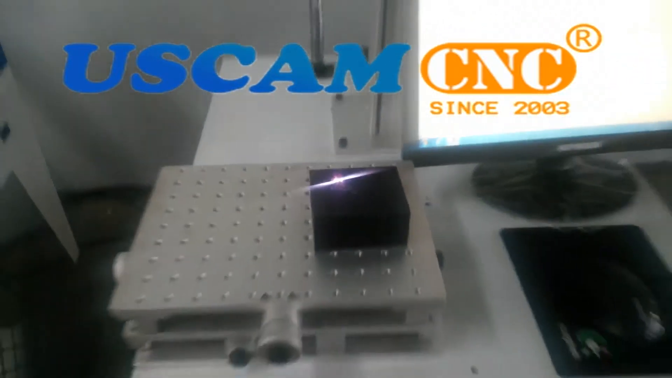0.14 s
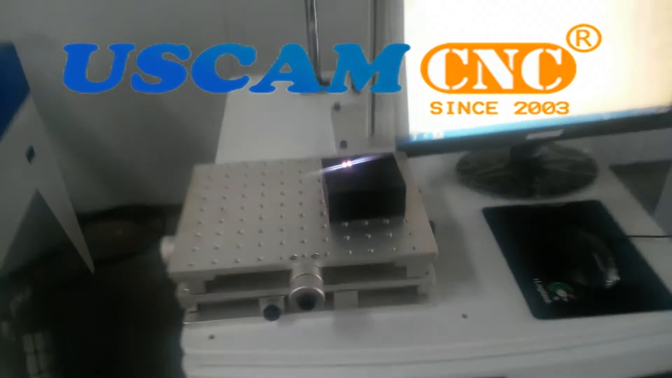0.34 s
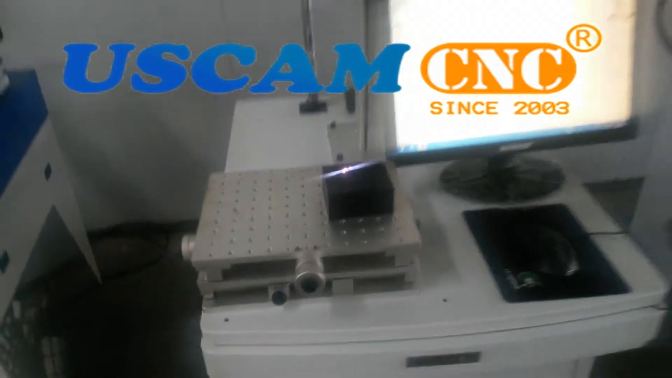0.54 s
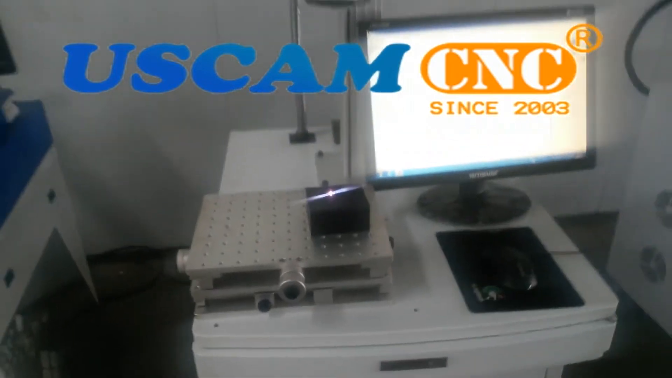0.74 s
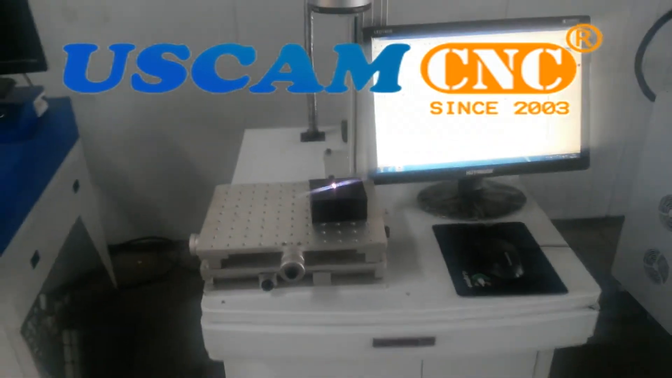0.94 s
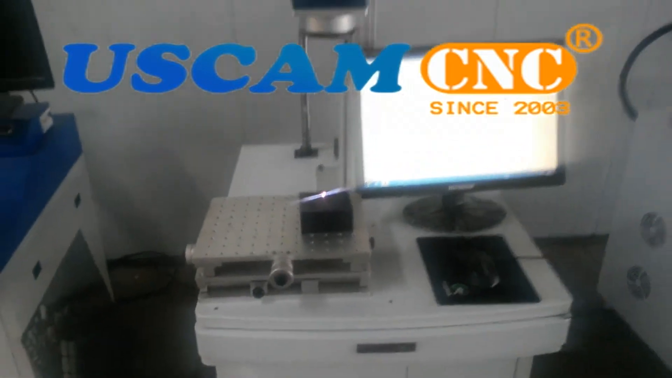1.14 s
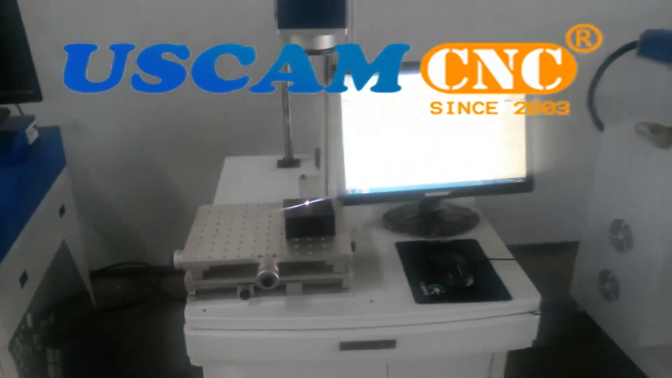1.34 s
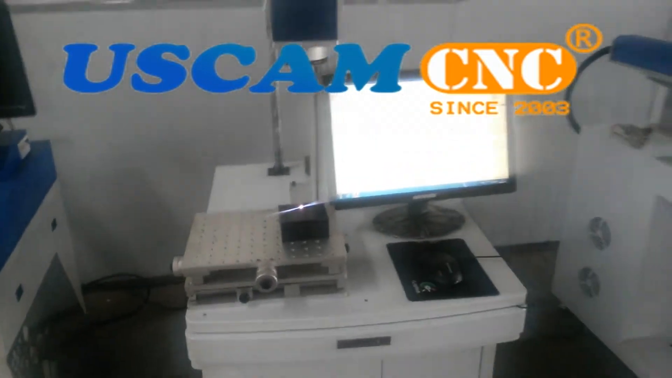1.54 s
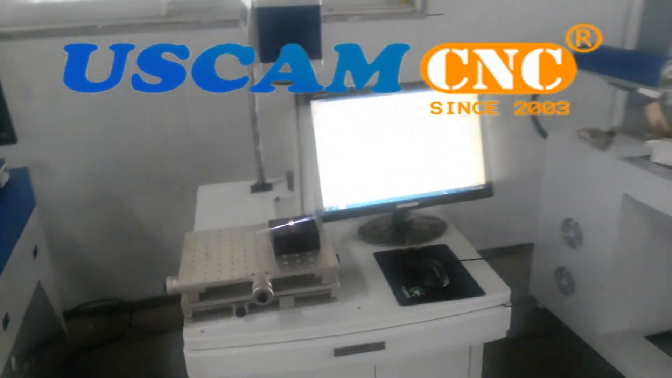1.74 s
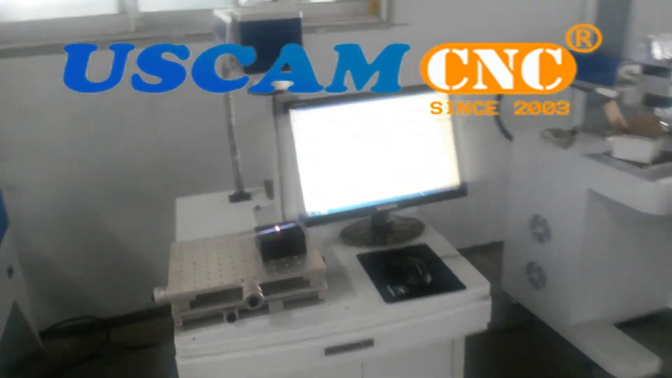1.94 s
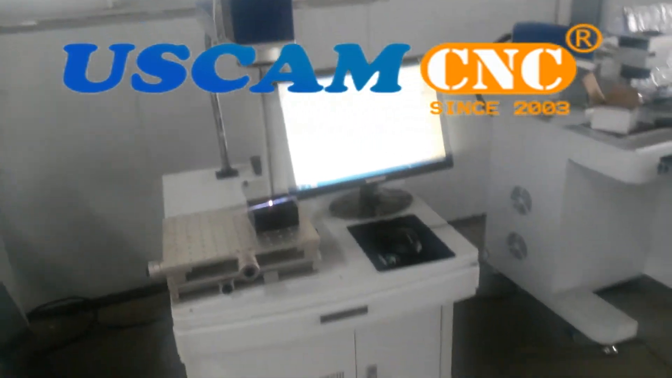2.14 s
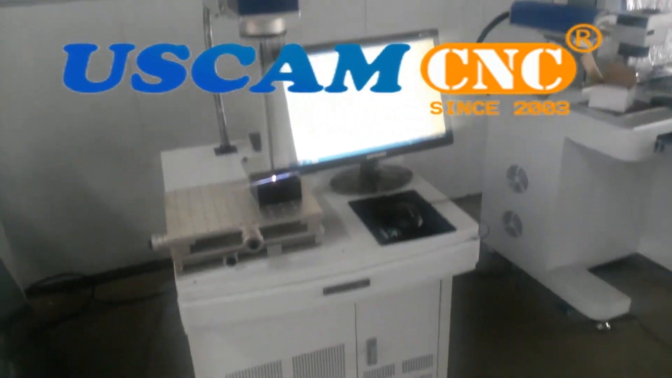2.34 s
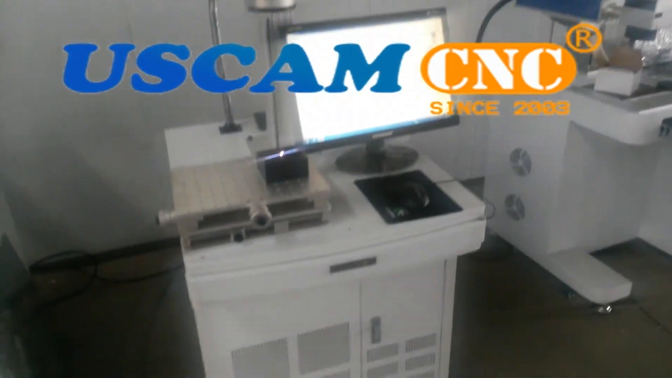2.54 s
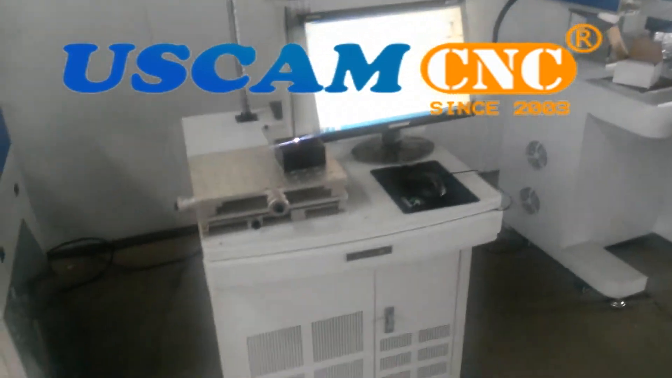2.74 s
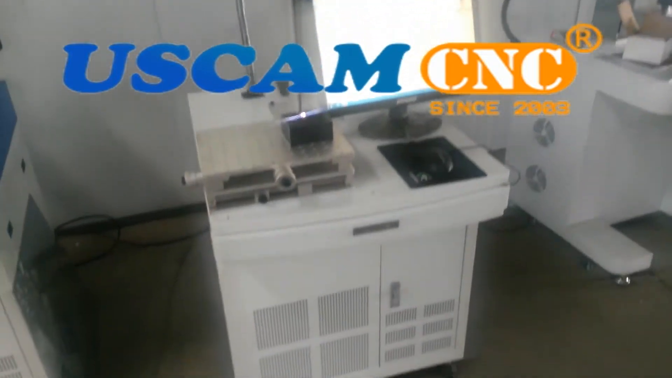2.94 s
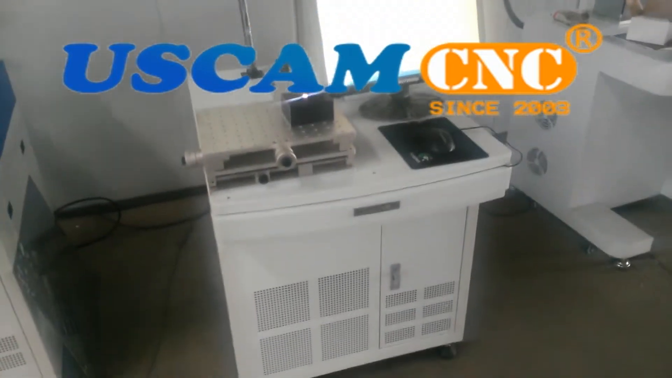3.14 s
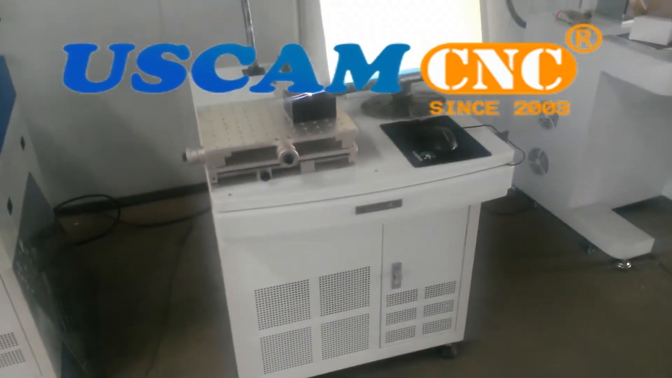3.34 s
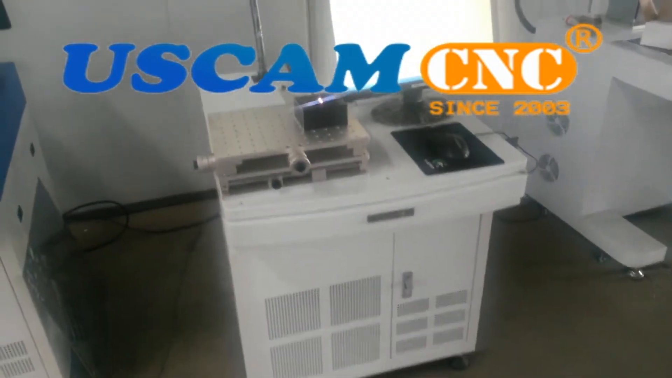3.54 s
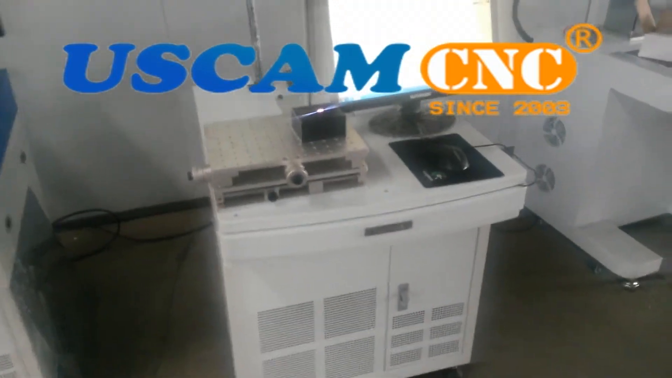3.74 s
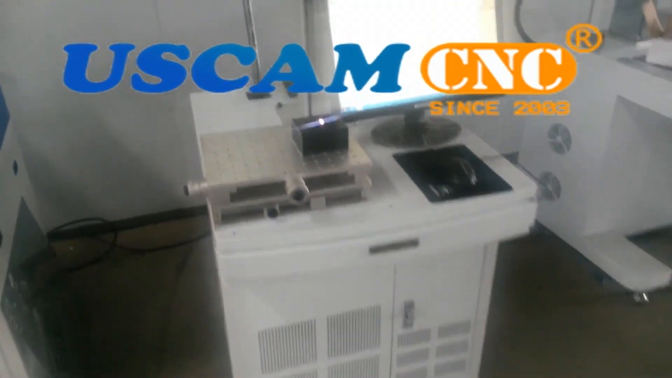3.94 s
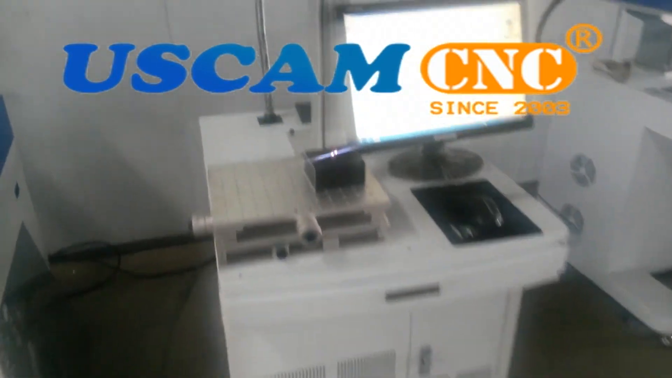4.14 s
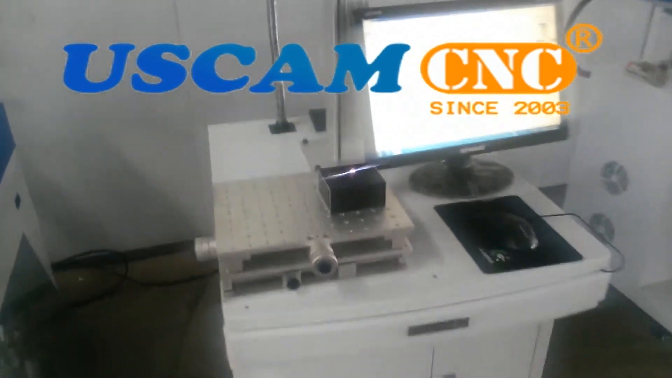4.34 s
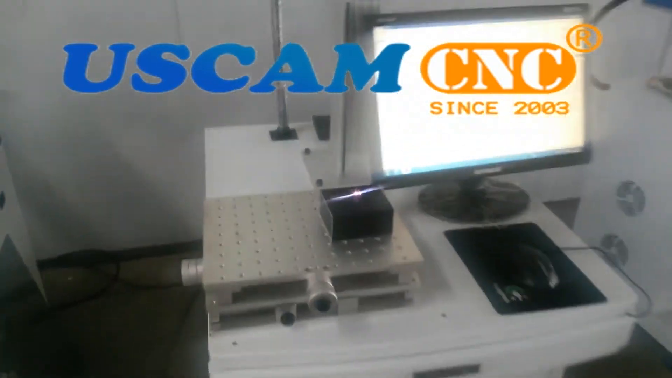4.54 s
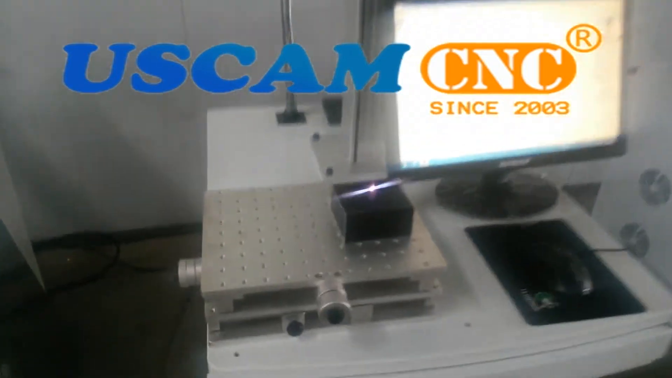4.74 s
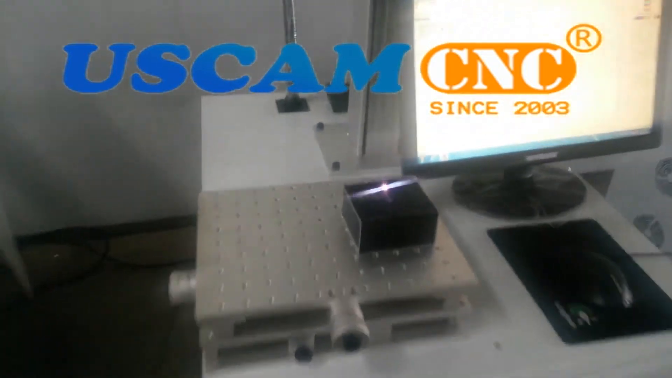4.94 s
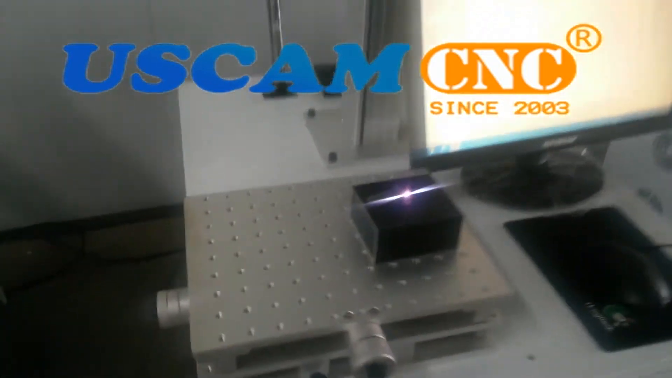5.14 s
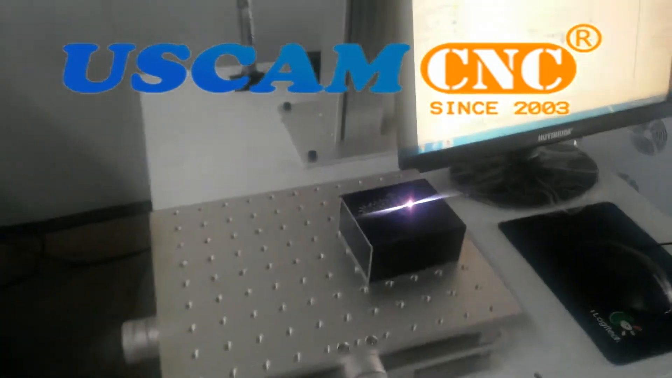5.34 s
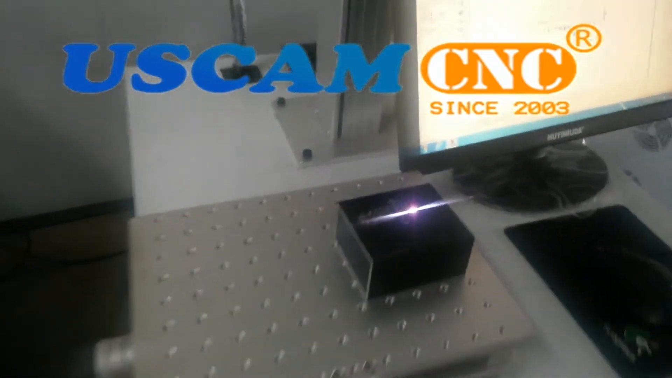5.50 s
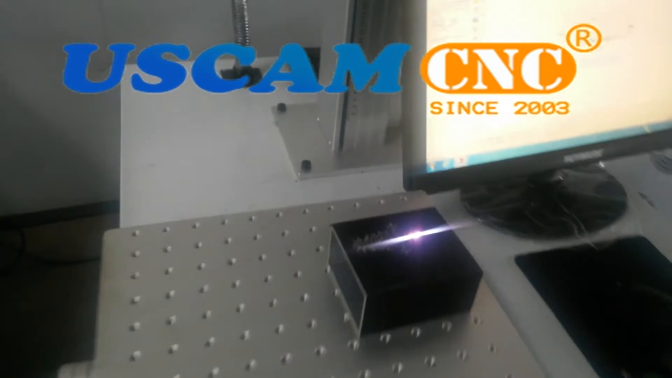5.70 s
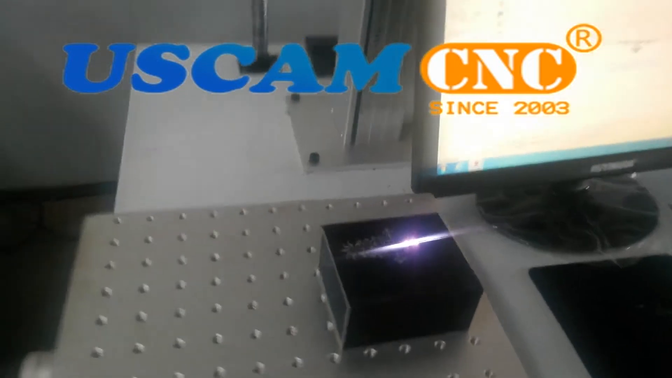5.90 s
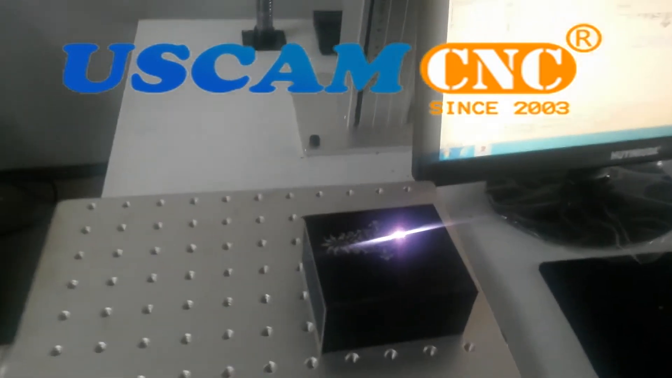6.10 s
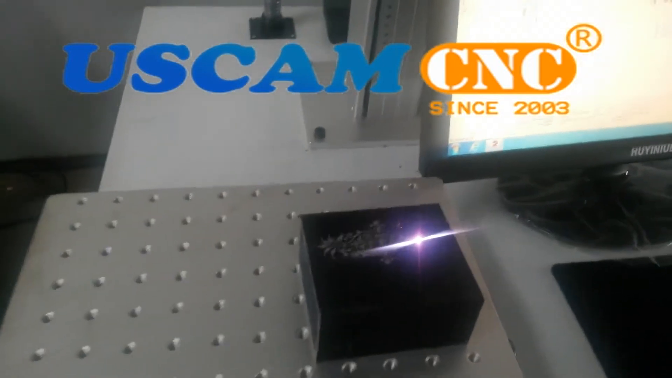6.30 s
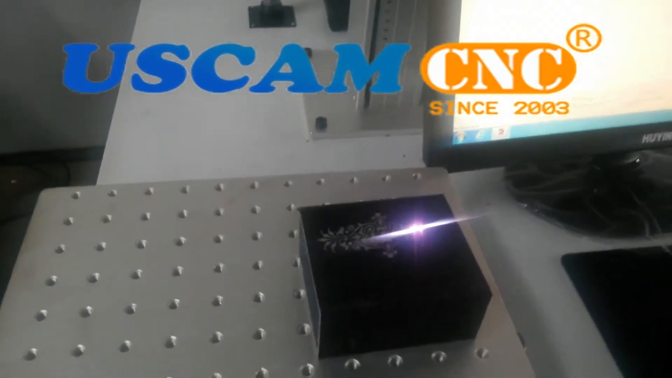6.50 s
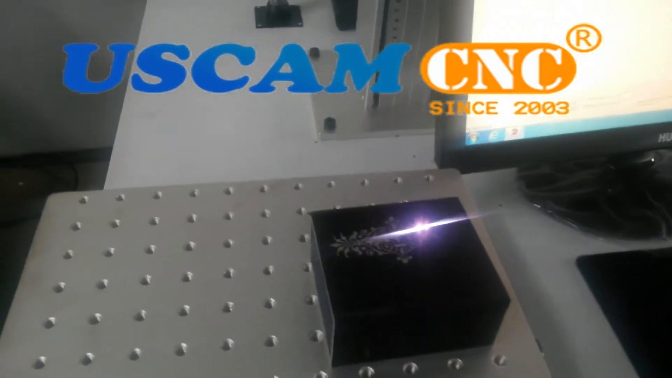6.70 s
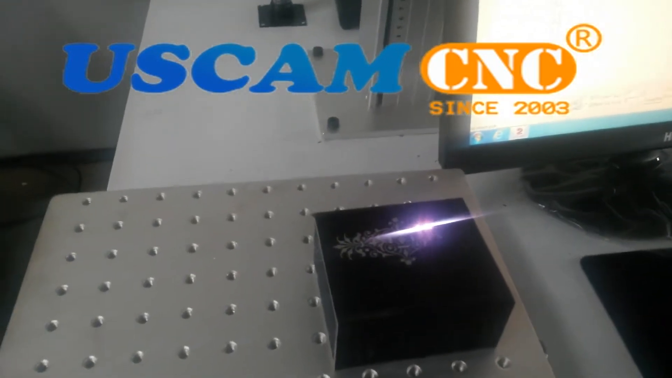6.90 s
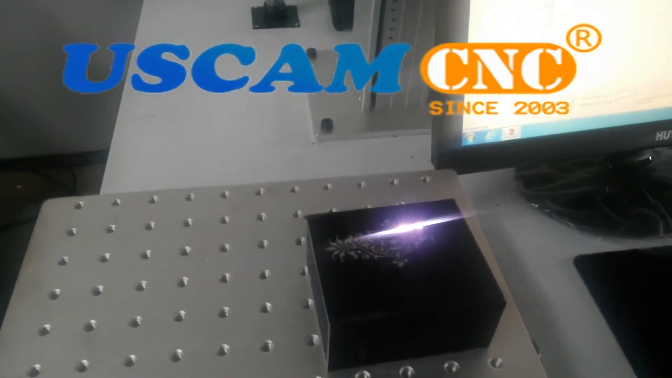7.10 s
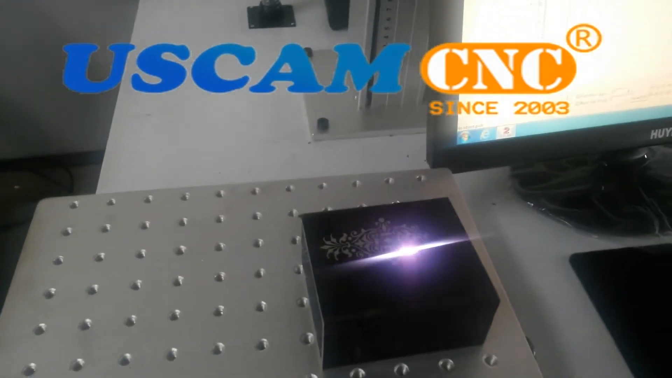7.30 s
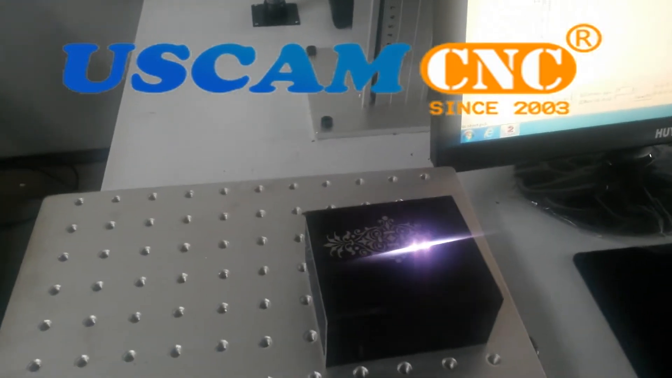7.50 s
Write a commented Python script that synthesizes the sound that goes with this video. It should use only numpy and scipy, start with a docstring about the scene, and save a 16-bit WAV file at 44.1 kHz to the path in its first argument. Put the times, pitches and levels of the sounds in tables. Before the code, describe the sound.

A laser marking machine engraves a steel block in a hard-walled workshop. Tiny rapid pops merge into a crackling buzz that keeps jumping in pitch, with a high hiss and thin whine, over steady cooling fans. At first it sounds distant and roomy. Just past halfway, the handheld microphone takes a short rumble and a clicking knock, then moves close, and the crackle turns louder and drier, with a few sharp snaps.

```python
"""Laser marking a steel block

Each scan line fires a row of tiny plasma pops, so the crackle buzzes at the gliding line rate.
Vapour hisses and the scan mirror whines. Cooling fans run in the hard-walled workshop.
A hand-held camera stands back, then comes close; a finger knocks it a few times."""
import sys
import numpy as np
from scipy import signal
from scipy.fft import rfft, irfft, next_fast_len
from scipy.io import wavfile
from scipy.ndimage import uniform_filter1d, map_coordinates

SR = 44100
rng = np.random.default_rng(int(sys.argv[2]) if len(sys.argv) > 2 else 0)


def digitize_waveform(pressure):
    """Quantize a signal to 16-bit integers and store it at the path in sys.argv[1].

    Rows of a 2-D input are taken as channels; values are limited to [-1, 1].
    """
    field = np.atleast_2d(pressure).T
    bounded = np.clip(field, -1, 1)
    quanta = np.round(bounded * 32767).astype(np.int16)
    wavfile.write(sys.argv[1], SR, quanta)


N = 333396

# Camera path. Each row: time in seconds, place (0 back in the room, 1 table edge, 2 over the block),
# relative crackle level in dB, left minus right in dB.
CAMERA_PATH = [(0, 0.42, -39, -2), (.8, 0.037, -41, 0.6), (2.9, .007, -41, 1.2), (3.7, 0.46, -36.5, -1),
               (4.15, 1.03, -35.5, 1.1), (4.8, 1.046, -34.5, 2.5), (5.15, 2.016, -31, 1.1),
               (5.7, 1.92, -30, 0), (6.5, 1.95, -30.5, 1.2), (7.56, 2.03, -30, 1.2)]
# Broad hatching. Each row: time in seconds, line rate in Hz, evenness (0 ragged, 1 even).
BROAD_SCAN = [(0, 164, 0.59), (.22, 135, 0.68), (.8, 92.5, 0.49), (1.3, 134, 0.62), (1.42, 126.5, 0.7),
              (2.4, 136, 0.67), (2.7, 140, 0.72), (2.78, 132, 0.76), (2.82, 93, .7), (3.36, 92, 0.71),
              (3.42, 87, 0.81), (3.48, 85, .85), (3.54, 87, .8), (4.47, 105, 0.72), (4.66, 94, 0.85),
              (4.7, 104, 0.54), (4.77, 46, .2), (4.88, 53.5, .2), (4.93, 94, 0.81), (5.04, 95.6, 0.87),
              (5.13, 102.4, 0.69), (5.65, 102, 0.84), (5.73, 93, .85), (5.77, 77, 0.8), (5.87, 68, .8),
              (5.96, 76.6, .7), (6.05, 60, 0.4), (6.33, 48.8, .2), (6.5, 70, 0.8), (6.58, 70, 0.84),
              (6.66, 72.6, 0.82), (6.76, 91.5, 0.91), (6.82, 103, 0.86)]
# Narrow shapes. Each row: start and length in seconds, line rate in Hz at start, middle and end,
# evenness, relative level in dB, return stroke's delay as a share of a line.
NARROW_SHAPES = [(0.362, 0.18, 223, 186, 190, 0.59, 0.5, 0.48),
                 (0.568, 0.076, 346, 320, 226, 0.47, 2, 0.48), (0.939, .11, 250, 310, 254, 0.68, 2.5, .5),
                 (1.07, .2, 198, 180, 143, 0.5, 1.5, 0.44), (1.52, 0.067, 370, 386, 377, 0.65, 1, 0.49),
                 (1.6, 0.082, 345, 316, 347, 0.58, 2.5, .5), (1.701, 0.057, 340, 384, 390, 0.59, 1.5, 0.53),
                 (1.79, .19, 286, 334, 317, 0.31, 0, 0.46), (2.0, 0.073, 334, 332, 344, 0.72, .7, 0.48),
                 (2.11, .21, 336, 283, 310, 0.47, 0.5, 0.48), (2.485, 0.074, 238, 236, 217, 0.87, 2.5, .5),
                 (2.97, .09, 111, 103, 107, 0.84, 1, 0.47), (3.07, 0.074, 370, 346, 340, 0.7, 1, .5),
                 (3.159, .13, 194, 183, 190, 0.62, 1, .5), (3.545, 0.17, 119, 126, 137, 0.88, -1, 0.49),
                 (3.72, 0.068, 135, 128, 144, 0.72, .5, 0.46), (3.801, 0.082, 205, 177, 186, 0.79, 1, .5),
                 (3.9, .13, 131, 137, 158, 0.79, 0.5, .47), (4.045, 0.071, 300, 262, 230, .85, 1.5, .56),
                 (4.115, 0.125, 226, 223, 225, .95, 0.5, .622), (4.24, .06, 225, 233, 255, .9, .5, .622),
                 (4.305, .1, 315, 277, 253, 0.92, 0, .56), (5.175, 0.059, 264, 261, 265, .9, 0.6, .44),
                 (5.235, .065, 262, 288, 337, 0.78, 1.5, 0.45), (5.31, .03, 208, 195, 226, .5, 1, 0.46),
                 (5.35, 0.16, 360, 270, 205, .68, 0, 0.46), (5.521, .055, 310, 355, 392, 0.83, 0.5, 0.34),
                 (5.576, 0.055, 370, 422, 428, 0.91, 1, 0.41), (6.2, .065, 258, 317, 267, 0.31, 1.5, 0.49),
                 (6.845, .1, 387, 390, 368, .998, 1.5, .488), (6.95, 0.049, 367, 325, 233, .68, -0.3, .47),
                 (7.005, 0.039, 202, 197, 208, .85, -1.5, 0.47),
                 (7.05, .035, 280, 325, 260, 0.51, -1.5, 0.46),
                 (7.09, 0.058, 208, 189, 243, 0.82, -2, 0.47), (7.16, .11, 216, 213, 188, .76, -1.1, .46),
                 (7.275, 0.086, 176, 159, 166, 0.82, -2, 0.44), (7.37, .11, 142, 126, 121, 0.82, -3, .47),
                 (7.49, 0.071, 210, 257, 326, 0.68, -1.5, 0.43)]
# Beam off between shapes. Each row: start and length in seconds.
BEAM_JUMPS = [(4.764, 0.0068), (5.305, .006), (6.024, .004), (6.106, .004), (6.115, .007), (6.131, .005),
              (6.151, .005), (6.23, .008), (6.303, .005), (6.314, .005)]
# Scan mirror modes, close up and from the room. Each row: centre and width in Hz, relative level in dB.
MIRROR_NEAR = [(1110, 160, -9), (1790, 280, -7), (2217, 240, -0.5), (3546, 120, -2)]
MIRROR_FAR = [(2212, 270, 0)]
# Single hard pops. Each row: time in seconds, relative level in dB.
HARD_POPS = [(4.7217, -31), (4.8495, -25), (4.866, -25), (4.976, -20), (6.037, -23), (6.125, -18),
             (6.143, -23), (6.3128, -25), (7.0976, -12), (7.2085, -20)]
# Left microphone port's lag. Each row: frequency in Hz, lag in radians from the room and close up.
PORT_LAG = [(200, .05, .05), (1550, 0.31, .35), (2400, 2.9, 1.8), (3450, 3.5, 2.85), (4400, 4.8, 3.6),
            (5500, 6, 3.88), (6530, 6, 3.3), (7200, 6.4, 5.56), (10000, 9.8, 7)]
# Pop colour from each place. Each row: frequency in Hz, left and right gain in dB.
COLOUR_ROOM = [(150, -22, -23), (468, -10.5, -8.5), (705, -12.5, -14), (930, -10.5, -9),
               (1270, -5.5, -22.5), (1710, 5.5, -3.5), (2216, 8, -8), (2770, -1.5, -7), (3490, 6.5, 0.5),
               (3920, 2, -2), (4300, -1, 1.5), (5450, -3, 6.5), (5940, -16, 3.5), (6680, -2, 1.5),
               (7960, -9.5, -5), (10500, -19, -11)]
COLOUR_EDGE = [(150, -14, -10.5), (466, -15, -16), (717, -4, -7.5), (920, -6, -15.5), (1320, -14, -30),
               (1730, 2.5, -12.5), (2310, 5.5, -2), (2830, 2, -3.5), (3400, 6, -3.5), (3600, 12, 6),
               (4240, -2.5, -2), (5000, -0.5, 2), (5550, -2, 6), (6170, -13, 0.5), (6750, -2, -3.5),
               (7900, -12, -2.5), (9900, -7.5, -6)]
COLOUR_ABOVE = [(150, -17, -17.5), (475, -17, -19.5), (590, -12, -11.5), (793, -7.5, -9), (900, -25, -23),
                (1020, -6, -9), (1170, -6, -8.5), (1275, -16, -23.5), (1505.8, 0, -8.5), (1685, 1.5, -9.5),
                (1940, 6.5, -4), (2439.4, 5, -2.5), (2900, 1, -2.5), (3120, 5, 1), (3270, 5.5, -1),
                (3520, 12, 3.5), (3730, 7.5, 6), (4350, 1.5, 0), (5230, -1, 7), (6040, -9, 0.5),
                (6620, 1, 1), (7060, -2, 0.5), (8150, -20.5, -8), (9550, -9.5, -9.5)]
# Low buzz. Each row: time in seconds, spectral centre in Hz, level in dB.
BUZZ_PATH = [(0, 270, -58), (.6, 280, -62), (1.4, 255, -57), (1.7, 340, -61), (2.3, 314, -63),
             (2.7, 270, -56), (3.15, 310, -61), (3.6, 253, -53.5), (4.02, 300, -58.5), (4.2, 230, -52.5),
             (4.35, 280, -54), (4.52, 205, -54), (4.68, 190, -52), (4.8, 220, -62), (5.04, 190, -49.5),
             (5.14, 300, -50.5), (5.38, 310, -46.5), (5.49, 220, -48.5), (5.56, 350, -47.5),
             (5.65, 300, -49), (5.82, 212, -49), (5.9, 310, -49.5), (6.08, 319, -50), (6.33, 270, -55.5),
             (6.5, 228, -50), (6.7, 220, -51), (6.78, 285, -52), (6.95, 340, -48), (7.03, 220, -51.5),
             (7.22, 220, -50), (7.28, 340, -50.5), (7.44, 252, -56), (7.55, 278, -47)]
# Air outlet resonance. Each row: centre and width in Hz, relative level in dB.
VENT_MODES = [(678, 157, 0)]
# Fan air spectrum. Each row: frequency in Hz, relative density in dB.
AIR_SPECTRUM = [(15, -54.5), (25, -19.5), (92, -4.5), (156, -7), (222, -10), (261, -6.5), (506, -12),
                (554, -11), (691, -6), (800, -11), (880, -13), (1010, -5), (1100, -10), (1220, -2),
                (1290, -8.5), (1410, -7), (2000, -4.5), (2600, -15), (4400, -120)]
# Fan air stereo image. Each row: frequency in Hz, left-right correlation.
AIR_CORRELATION = [(40, .25), (120, .5), (300, 0.67), (1200, 0.68), (3000, 0.22)]
# Blade and mains tones. Each row: frequency in Hz, level in dB, waver in Hz, change over the block in dB.
FAN_TONES = [(98.7, -67, 1.4, -0.5), (600, -65.5, 9, 6.5), (681.6, -59.5, 3, 0.5), (1220, -55.5, 7.5, -9),
             (1557, -67, 9.033, 5.5), (3120, -71, 6, -2)]
# Hand shifts on the camera. Each row: centre and half-width in seconds, rumble rise in dB.
GRIP_SHIFTS = [(4.14, 0.062, 12), (4.418, 0.074, 6)]
# Knocks on the camera. Each row: time in seconds, gain in dB, extra click gain in dB.
KNOCKS = [(4.4095, -31, 3.5), (4.4175, -32, 3), (3.3, -52, -19), (.9, -40, -22)]
# Camera body modes. Each row: frequency in Hz, relative level in dB, T60 in seconds.
THUD_MODES = [(90.5, -6.5, 0.11), (170, -17, 0.026), (355, 3.5, 0.013), (456, -4, 0.04)]
CLICK_MODES = [(1090, -8, 0.01), (1250, 1.5, 0.013), (1740, -5, 0.023)]


def amp(db):
    """Decibels to gain."""
    return 10 ** (np.asarray(db) / 20)


def unit(x):
    """Scale to rms 1."""
    return x / np.sqrt(np.mean(x ** 2) + 1e-20)


def along(table, hz, column=1):
    """One table column, interpolated over log frequency."""
    columns = np.transpose(table)
    return np.interp(np.log(hz + 1), np.log(columns[0] + 1), columns[column])


def curves(table):
    """Each column after the time, interpolated per sample."""
    times_s, *columns = np.transpose(table)
    return [np.interp(np.arange(N) / SR, times_s, column) for column in columns]


def wobble(rate_hz):
    """Smooth random curve, rate_hz knots a second."""
    knots = int(N * rate_hz / SR) + 4
    fine = np.arange(0, knots, 1 / 20)
    spline = map_coordinates(rng.standard_normal(knots), [fine])
    return np.interp(np.arange(N) * rate_hz / SR, fine, spline)


def filtered(x, response):
    """Apply a complex frequency response."""
    size = 2 * next_fast_len(N // 2 + SR // 4)
    return irfft(rfft(x, size) * response(np.fft.rfftfreq(size, 1 / SR)), size)[..., :N]


def minimum_phase(gain):
    """Response with this gain that rings only after the blow."""
    cepstrum = irfft(np.log(gain))
    half = cepstrum.shape[-1] // 2
    cepstrum[..., 1:half] *= 2
    cepstrum[..., half + 1:] = 0
    return np.exp(rfft(cepstrum))


def resonances(modes, hz):
    """Summed band-pass modes of alternating sign."""
    return sum((-1) ** k * amp(db) * 1j * hz * width / (centre ** 2 - hz ** 2 + 1j * hz * width)
               for k, (centre, width, db) in enumerate(modes))


def impulses(at, sizes):
    """Windowed-sinc impulses at fractional sample positions."""
    taps = np.floor(at)[:, None].astype(int) + np.arange(-7, 9)
    offset = taps - at[:, None]
    shape = np.sinc(offset) * np.sinc(offset / 8)
    return np.bincount(np.clip(taps, 0, N).ravel(), (sizes[:, None] * shape).ravel(), N + 1)[:N]


def hatching(db_per_octave=1.73, broad_return=.47, glide_s=.008, outline_octaves=.2):
    """Scan controls per sample: broad hatching, broken by narrow shapes with shorter, faster lines."""
    t = np.arange(N) / SR
    rate_hz, even = curves(BROAD_SCAN)
    burn_db = db_per_octave * np.log2(rate_hz / np.median(rate_hz))  # fast lines lose less time turning
    scan = np.array([rate_hz, even, burn_db, np.full(N, broad_return)])
    for start_s, length_s, first_hz, middle_hz, last_hz, evenness, db, return_share in NARROW_SHAPES:
        blend = np.clip(1 + (length_s / 2 - np.abs(t - start_s - length_s / 2)) / glide_s, 0, 1)
        now = blend > 0
        progress = np.clip((t[now] - start_s) / length_s, 0, 1)
        arc_hz = np.polyval(np.polyfit([0, .5, 1], [first_hz, middle_hz, last_hz], 2), progress)
        for control, target in zip(scan, [arc_hz, evenness, db, return_share]):
            control[now] += blend[now] * (target - control[now])
    rate_hz, even, burn_db, return_share = scan
    even = np.clip(even, 0, 1)
    bend_octaves = outline_octaves * (1 - even) ** 1.5 * wobble(11)  # ragged outlines vary line length
    return rate_hz * 2 ** bend_octaves, even, burn_db, return_share


def scan_lines(scan, ragged_s=.000699):
    """Start in samples and rate in Hz of each line; ragged detail upsets the beat."""
    rate_hz, even, *_ = scan
    turns = np.cumsum(rate_hz) / SR
    starts = np.interp(np.arange(1, int(turns[-1])), turns, np.arange(N))
    line = starts.astype(int)
    jitter = SR * ragged_s * (1 - even[line]) ** 2 * rng.standard_normal(len(line))
    return starts + jitter, rate_hz[line]


def beam_on():
    """1 while the beam burns, 0 while it jumps between shapes."""
    on = np.ones(N)
    for start_s, length_s in BEAM_JUMPS:
        on[round(start_s * SR):round((start_s + length_s) * SR)] = 0
    return on


def plasma(scan, two_pop_hz=421, drift_hz=6, jitter_s=.00007, stroke_db=2.5, scatter_db=1.5, later_db=-2):
    """Pops of steady power: each line crosses nearly the same strokes as the line before."""
    _, even, _, return_share = scan
    starts, rate_hz = scan_lines(scan)
    line = np.clip(starts.astype(int), 0, N - 1)
    drift = lambda: map_coordinates(rng.standard_normal(400), [starts * drift_hz / SR], mode="mirror")
    # A short line burns once out, once back; a long one crosses more strokes, less evenly.
    strokes = 2 * (two_pop_hz / rate_hz) ** .79
    spread = np.clip(strokes / strokes.mean() / 2, 0, 1)
    loose = spread * np.sqrt(1 - even[line])
    pops = np.zeros(N)
    for k in range(10):
        line_share = (k * return_share[line]) % 1 + .09 * loose * drift()
        delay_s = line_share / rate_hz + jitter_s * loose * rng.standard_normal(len(line))
        pop_db = stroke_db * spread * drift() + scatter_db * rng.standard_normal(len(line))
        sizes = amp(pop_db + later_db * (k > 0)) * np.clip(strokes - k, 0, 1)
        pops += impulses(starts + SR * delay_s, sizes)
    power = uniform_filter1d(uniform_filter1d(pops ** 2, size=2200), size=2200)
    return pops / np.sqrt(np.abs(power) + 1e-6)


def mirror_whine(scan, far, return_gain=.097, far_db=-12.5, near_db=-16.5):
    """The mirror jerks and rings at both ends of a line; close up, the pops cover it."""
    starts, rate_hz = scan_lines(scan)
    sizes = rate_hz ** -.5
    jerks = impulses(starts, sizes) + return_gain * impulses(starts + SR / rate_hz / 2, sizes)
    jerks *= beam_on()
    far_ring = unit(filtered(jerks, lambda hz: resonances(MIRROR_FAR, hz) ** 2))
    near_ring = unit(filtered(jerks, lambda hz: resonances(MIRROR_NEAR, hz)))
    return far * amp(far_db) * far_ring + (1 - far) * amp(near_db) * near_ring


def sizzle(pops, life_s=.011, highpass_hz=3920):
    """Vapour hisses off the steel around each pop, reaching each port differently."""
    t = np.arange(-300, 301) / SR
    puff = np.exp(-np.abs(t) / life_s)
    plume = np.abs(signal.fftconvolve(pops ** 2, puff / puff.sum(), mode="same"))
    hiss = np.sqrt(plume) * rng.standard_normal((2, N))
    return filtered(hiss, lambda hz: hz ** 2 / (hz ** 2 + highpass_hz ** 2))


def direct_path(source, far):
    """The direct sound reaches the left port later than the right."""
    half_lag = .5j * np.array([[-1], [1]])
    return sum(filtered(share * source, lambda hz: np.exp(half_lag * along(PORT_LAG, hz, column)))
               for column, share in [(1, far), (2, 1 - far)])


def workshop(source, early_t60_s=.053, wall_t60_s=.41, size=8192):
    """Table and cabinet echoes, then the walls' tail; redrawn per block for the moving camera."""
    out = np.zeros((2, N + 2 * SR))
    window = np.sin(np.pi * np.arange(size) / size)
    padded = np.pad(source, (size // 2, size))
    age_s = np.arange(size) / SR
    decay = np.hypot(unit(amp(-60 * age_s / wall_t60_s)), unit(amp(-60 * age_s / early_t60_s)))
    for start in range(0, N + size // 2, size // 2):
        response = rng.standard_normal((2, size)) * decay / np.linalg.norm(decay)
        echo = signal.fftconvolve((padded[start:start + size] * window)[None], response, axes=1)
        out[:, start:start + echo.shape[1]] += echo
    return out[:, size // 2:][:, :N]


def port_colour(colour, hz, highpass_hz=90):
    """Each port has its own gain; both share the ring of the pop."""
    gains = amp([along(colour, hz, column=1), along(colour, hz, column=2)])
    shared = np.sqrt(gains[0] * gains[1])
    return gains / shared * minimum_phase(shared) * 1j * hz / (1j * hz + highpass_hz)


def laser(scan, gain_db=6, lowpass_hz=8670, hard_gain_db=15, wet_far_db=3.5, wet_near_db=-5):
    """Pops, whine and hiss: louder, drier and changed in colour as the camera comes close."""
    _, even, burn_db, _ = scan
    place, path_db, pan_db = curves(CAMERA_PATH)
    far = np.clip(1 - place, 0, 1)
    flicker_db = .5 * wobble(11)
    sputter_db = 2.5 * (1 - even) ** 2 * wobble(90)  # ragged detail sputters
    level = amp(path_db + burn_db + flicker_db + sputter_db + gain_db)
    pops = plasma(scan) * beam_on()
    crackle = filtered(pops, lambda hz: 1 / np.hypot(1, (hz / lowpass_hz) ** 2))
    whine = even ** 2 * mirror_whine(scan, far)  # even reversals shake the mirror hardest
    hiss = level * amp(-7 * even ** 12) * sizzle(pops) * beam_on()  # even hatching burns cleanly
    hard_s, hard_db = np.transpose(HARD_POPS)
    source = level * (crackle + whine) + impulses(hard_s * SR, amp(hard_db + hard_gain_db))
    wet = amp(wet_far_db + (wet_near_db - wet_far_db) * place / 2)
    ports = (direct_path(source, far) + wet * workshop(source)) / np.sqrt(1 + wet ** 2) + hiss
    heard = np.zeros((2, N))
    for k, colour in enumerate([COLOUR_ROOM, COLOUR_EDGE, COLOUR_ABOVE]):
        share = np.clip(1 - np.abs(place - k), 0, 1)
        heard += share * filtered(ports, lambda hz: port_colour(colour, hz))
    return heard * amp([pan_db / 2, -pan_db / 2])


def low_buzz(scan, spread_octaves=.31, waver_octaves=.1507, rough_db=3.5, harmonics=7):
    """Line-rate harmonics near a centre that shifts with the pattern; ragged detail makes them waver."""
    rate_hz, even, *_ = scan
    centre_hz, level_db = curves(BUZZ_PATH)
    pitch_hz = rate_hz * 2 ** (waver_octaves * (1 - even) * wobble(50))
    phase = 2 * np.pi * np.cumsum(pitch_hz) / SR
    orders = np.arange(1, harmonics + 1)[:, None]
    weights = np.exp(-.5 * (np.log2(orders * rate_hz / centre_hz) / spread_octaves) ** 2) + 1e-9
    partials = np.sin(orders * phase + rng.uniform(0, 2 * np.pi, (harmonics, 1)))
    buzz = np.sum(weights * partials, axis=0) / np.linalg.norm(weights, axis=0)
    return amp(level_db) * unit(buzz * amp(rough_db * wobble(55))) * amp([[1], [-1]])


def vent(near_db=-51.5, side_gain=.3):
    """Air rushes through a resonant outlet that the camera approaches."""
    place, *_ = curves(CAMERA_PATH)
    mid, side = filtered(rng.standard_normal((2, N)), lambda hz: resonances(VENT_MODES, hz) ** 2)
    return amp(near_db) * place / 2 * unit(np.array([mid + side_gain * side, mid - side_gain * side]))


def fans(air_db=-45, rumble_hz=199.9, wander_db=1.6, wander_rad=.32):
    """Cooling air with wavering blade tones and mains hum; the rumble swells when the grip shifts."""
    def mid_side_gains(hz):
        angle = np.arccos(np.clip(along(AIR_CORRELATION, hz), -1, 1)) / 2
        return amp(along(AIR_SPECTRUM, hz)) * [np.cos(angle), np.sin(angle)]

    mid, side = filtered(rng.standard_normal((2, N)), mid_side_gains)
    air = amp(air_db) * unit(np.array([mid + side, mid - side]))
    t = np.arange(N) / SR
    rise_db = sum(db * np.exp(-((t - at_s) / half_s) ** 2) for at_s, half_s, db in GRIP_SHIFTS)
    rumble = filtered(air, lambda hz: 1 / (1 + (hz / rumble_hz) ** 4))
    air += rumble * (amp(rise_db) - 1)
    place, *_ = curves(CAMERA_PATH)
    for hz, db, waver_hz, near_db in FAN_TONES:
        phase = 2 * np.pi * np.cumsum(hz + waver_hz * wobble(40)) / SR
        # The camera moves through the room's standing waves.
        tone_db = db + near_db * place / 2 + wander_db * wobble(3.05)
        port_rad = wander_rad * np.array([wobble(1.8), wobble(2.029)])
        air += np.sqrt(2) * amp(tone_db) * np.sin(phase + port_rad)
    return air * amp([[.9], [-.9]])


def knocks():
    """A finger knocks the camera: a dull thud with a plastic click."""
    out = np.zeros(N + SR)
    t = np.arange(SR // 4) / SR
    thud, click = (sum(amp(db - 60 * t / t60_s) * np.sin(2 * np.pi * hz * t) for hz, db, t60_s in modes)
                   for modes in (THUD_MODES, CLICK_MODES))
    for start_s, db, click_db in KNOCKS:
        out[round(start_s * SR):][:len(t)] += amp(db) * (thud + amp(click_db) * click)
    return out[:N] * amp([[2.5], [-2.5]])


def scene():
    """Laser with its low buzz, cooling air and handling."""
    scan = hatching()
    return laser(scan) + low_buzz(scan) + vent() + fans() + knocks()


def record(dry, top_hz=10330):
    """The camera's steep band limit."""
    return filtered(dry, lambda hz: np.clip((top_hz - hz) / 100 + .5, 0, 1))


dry = scene()
out = record(dry)
digitize_waveform(out)
```